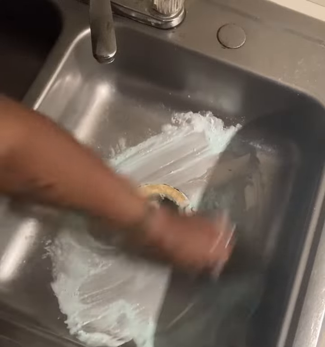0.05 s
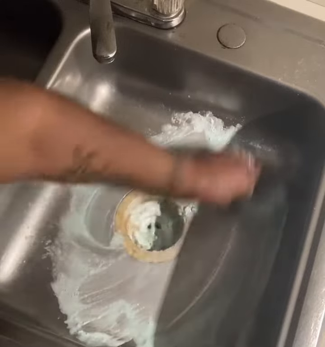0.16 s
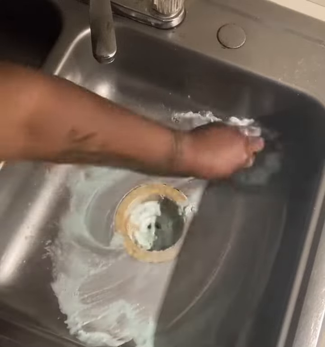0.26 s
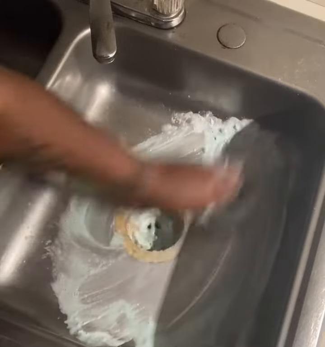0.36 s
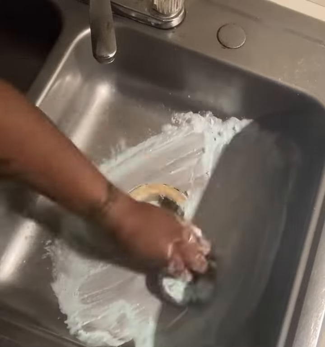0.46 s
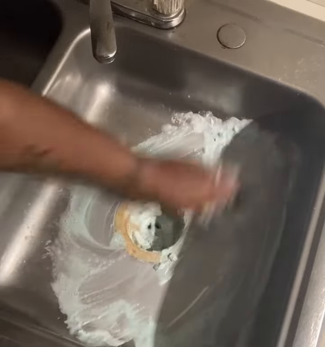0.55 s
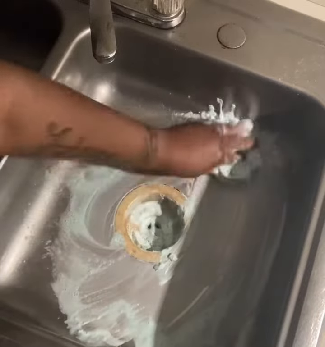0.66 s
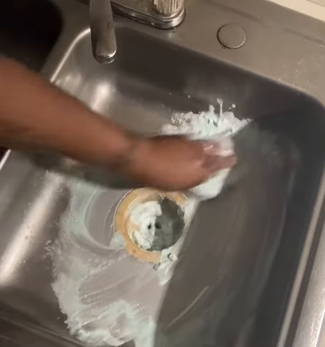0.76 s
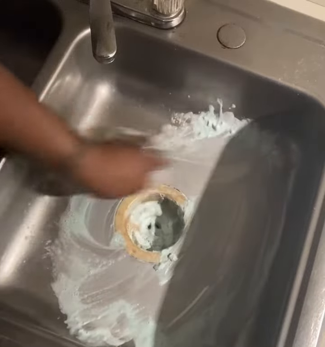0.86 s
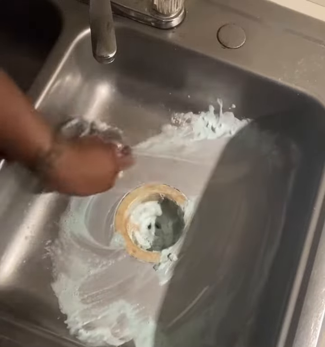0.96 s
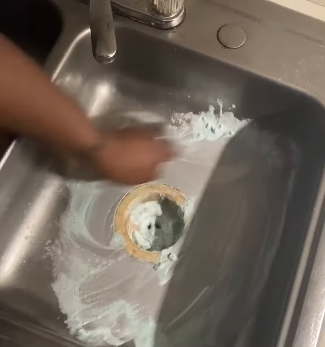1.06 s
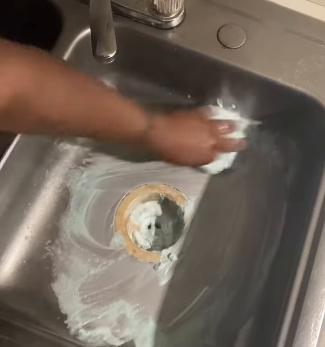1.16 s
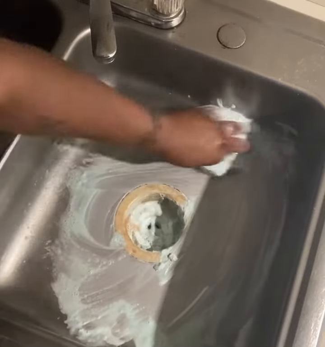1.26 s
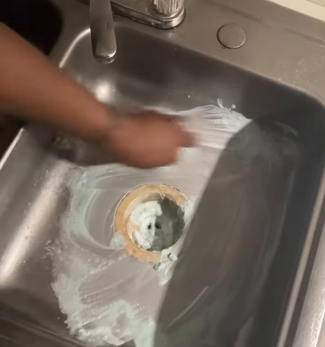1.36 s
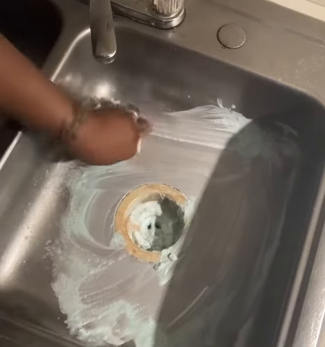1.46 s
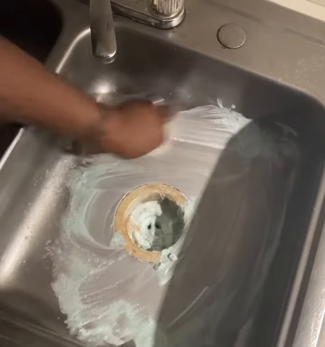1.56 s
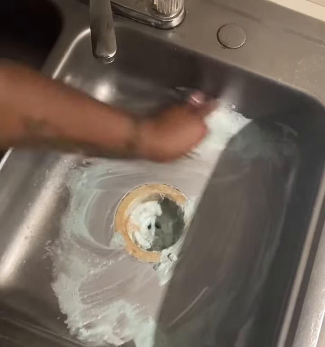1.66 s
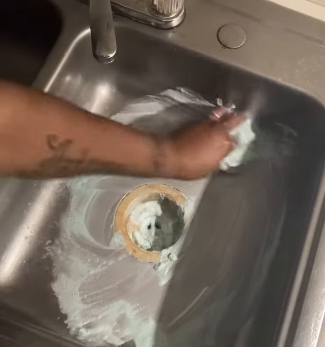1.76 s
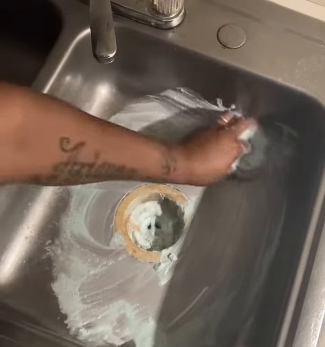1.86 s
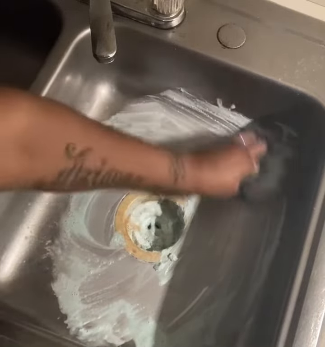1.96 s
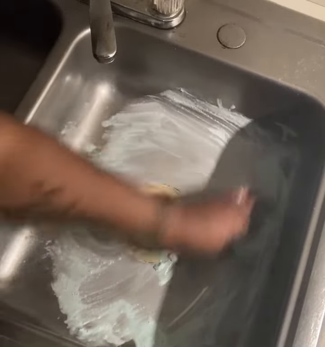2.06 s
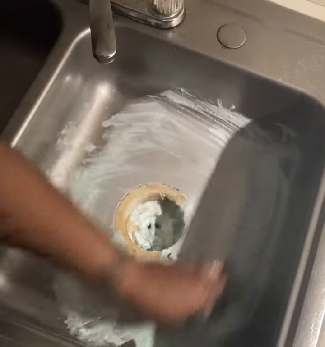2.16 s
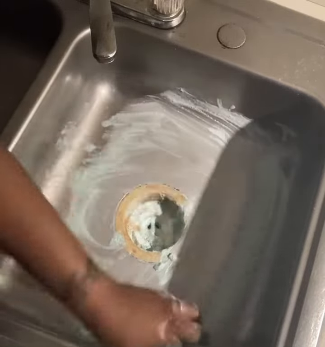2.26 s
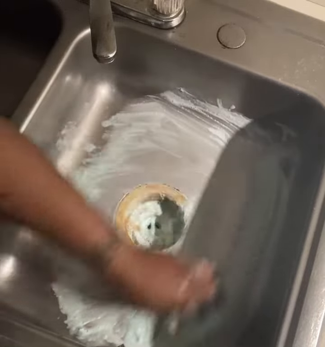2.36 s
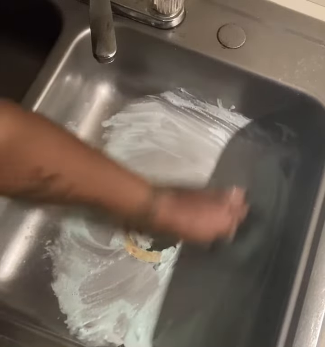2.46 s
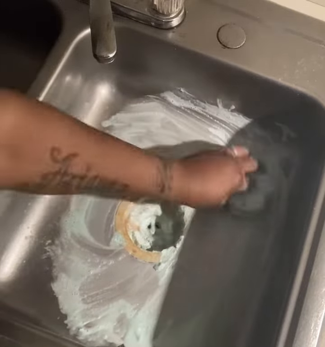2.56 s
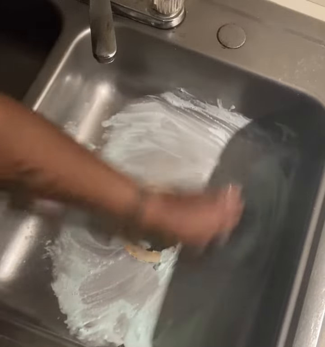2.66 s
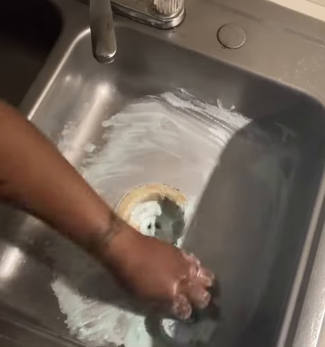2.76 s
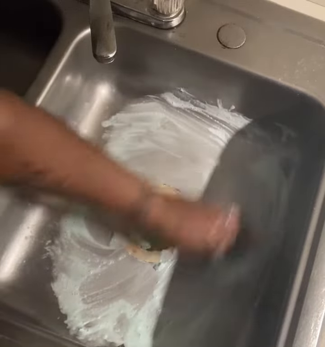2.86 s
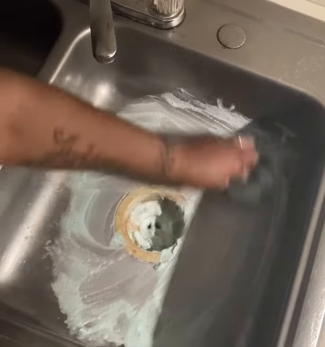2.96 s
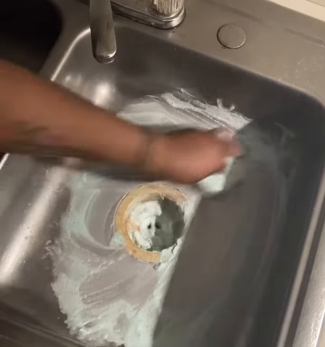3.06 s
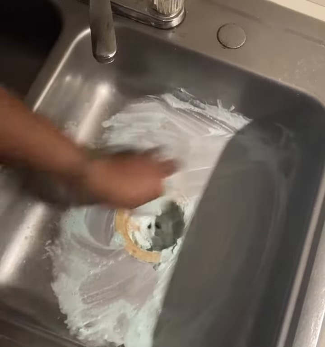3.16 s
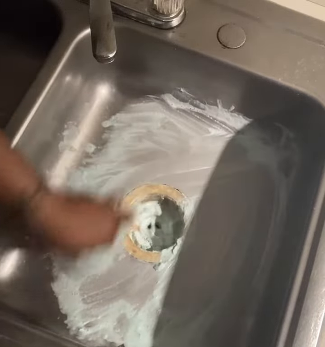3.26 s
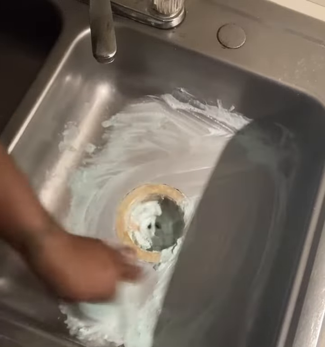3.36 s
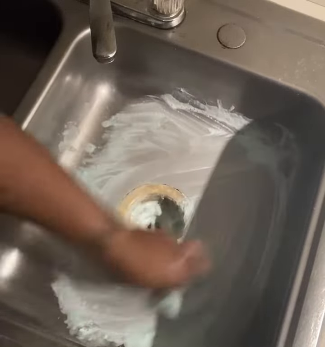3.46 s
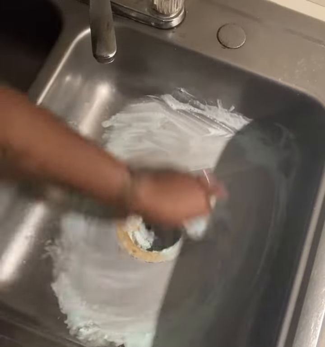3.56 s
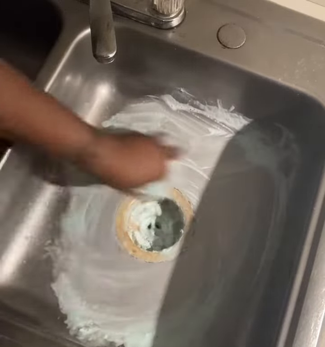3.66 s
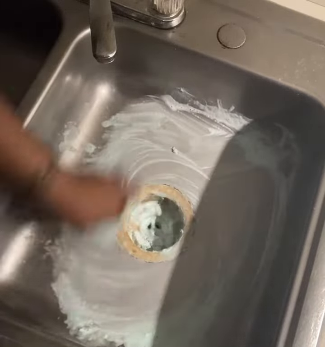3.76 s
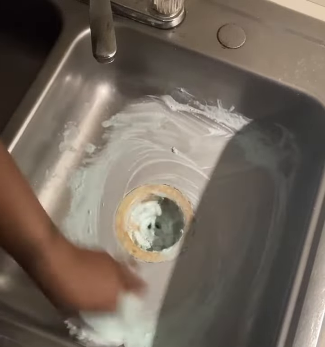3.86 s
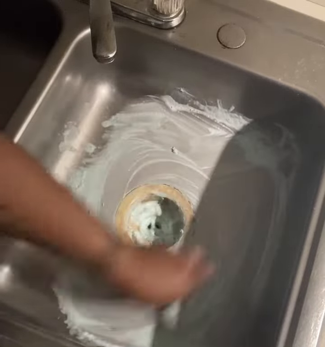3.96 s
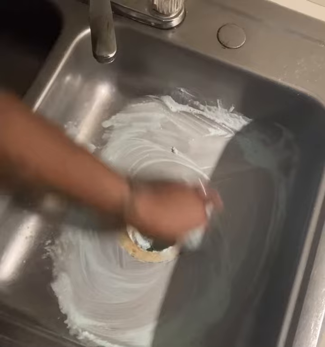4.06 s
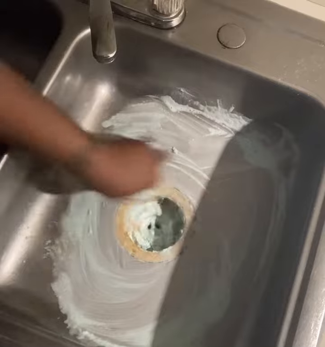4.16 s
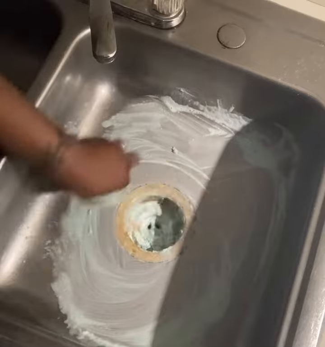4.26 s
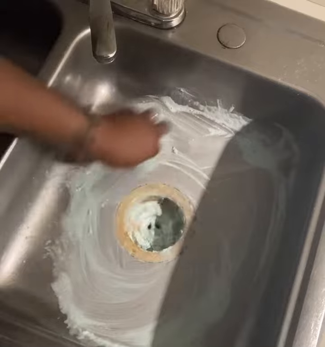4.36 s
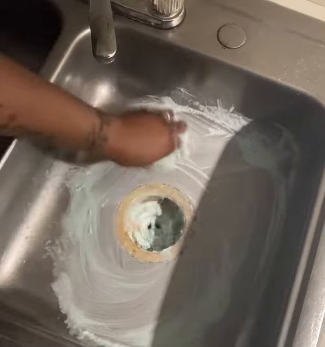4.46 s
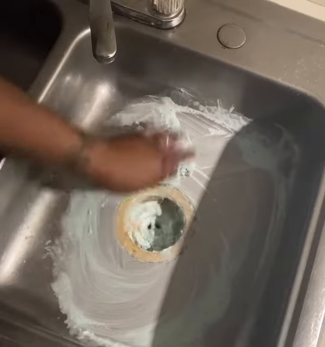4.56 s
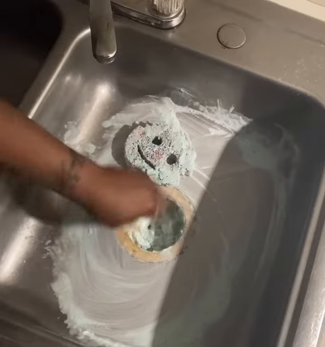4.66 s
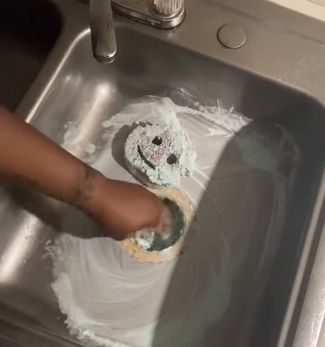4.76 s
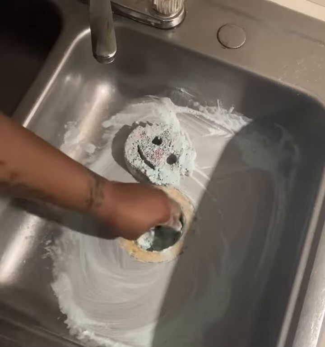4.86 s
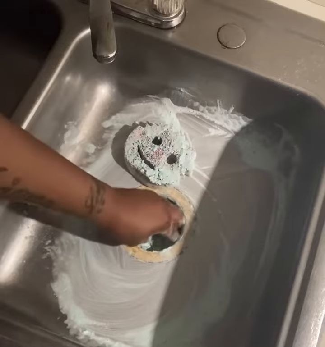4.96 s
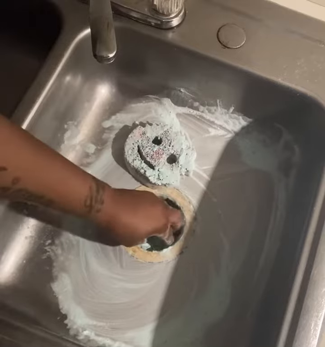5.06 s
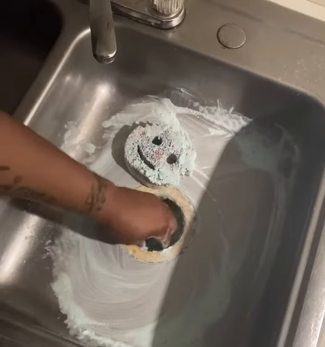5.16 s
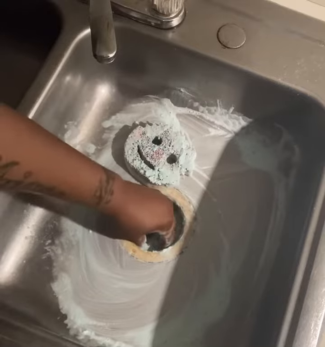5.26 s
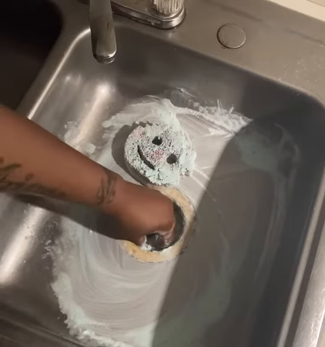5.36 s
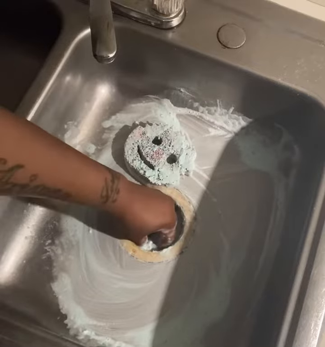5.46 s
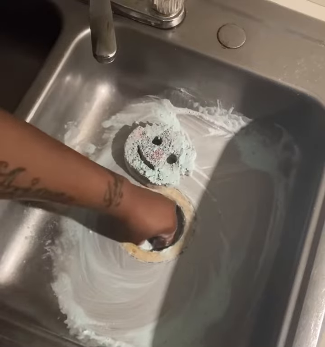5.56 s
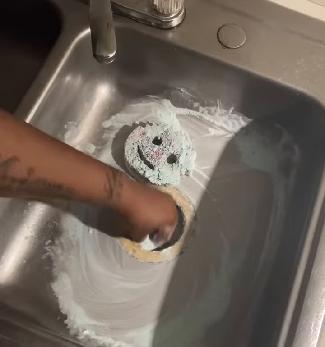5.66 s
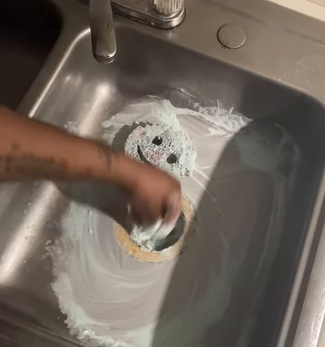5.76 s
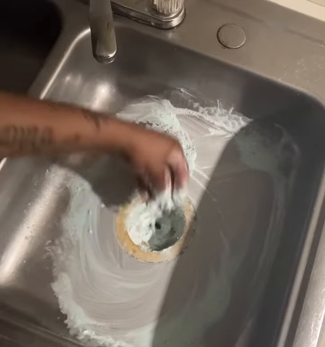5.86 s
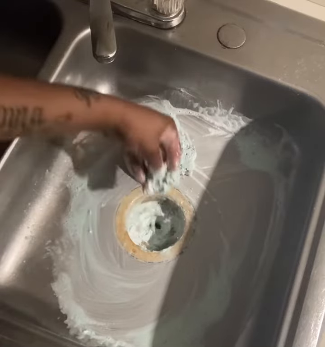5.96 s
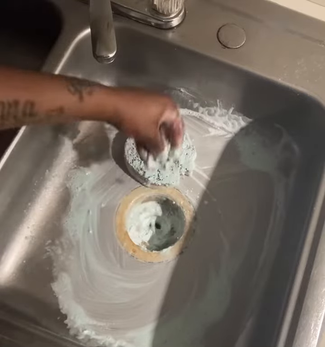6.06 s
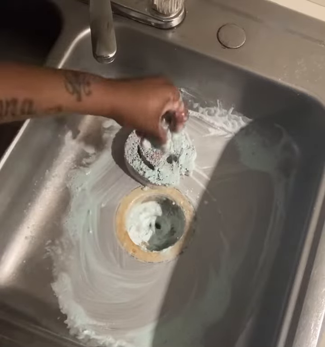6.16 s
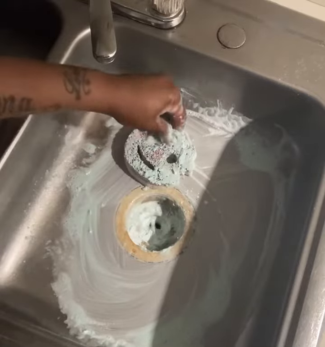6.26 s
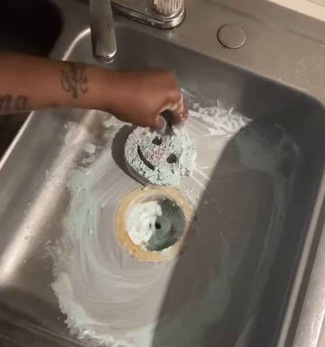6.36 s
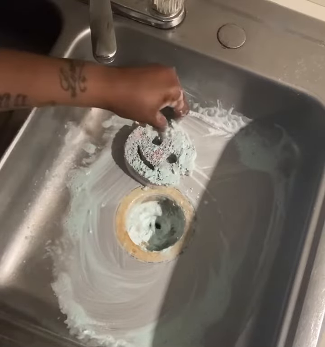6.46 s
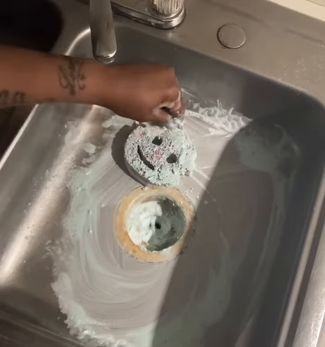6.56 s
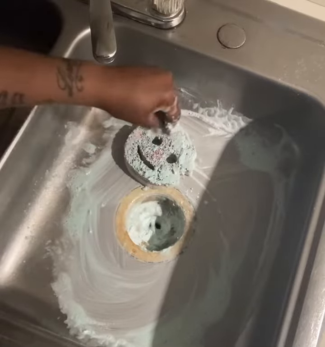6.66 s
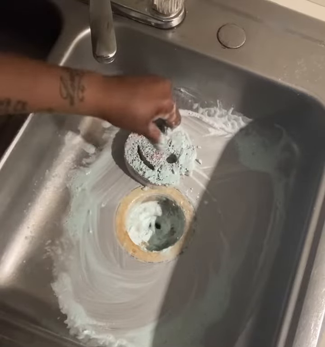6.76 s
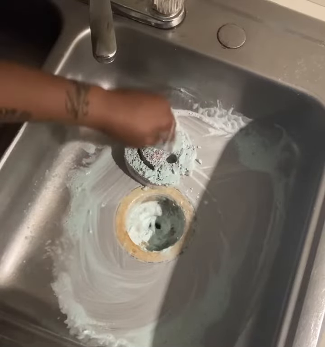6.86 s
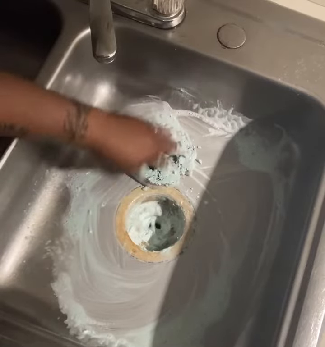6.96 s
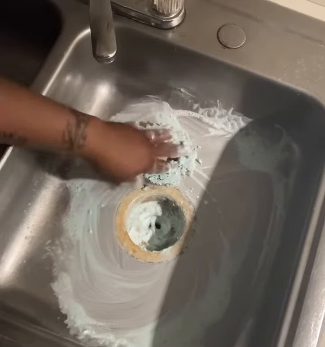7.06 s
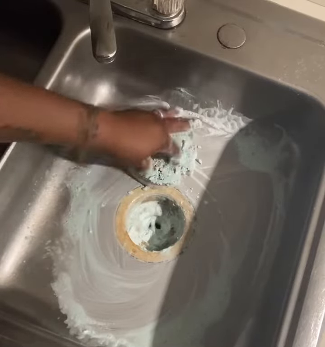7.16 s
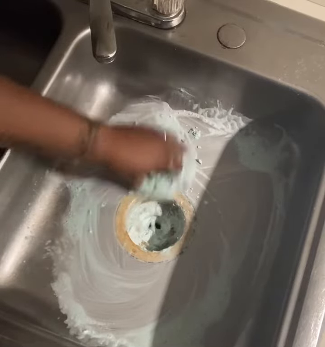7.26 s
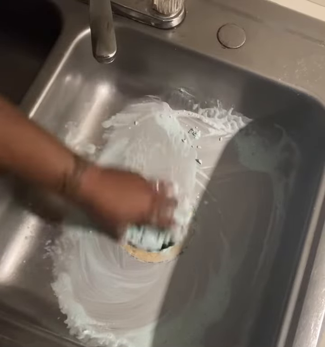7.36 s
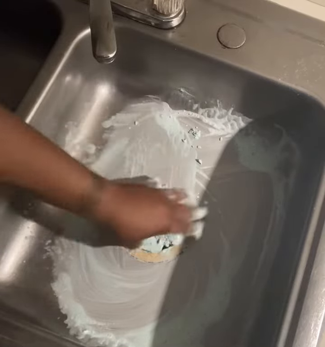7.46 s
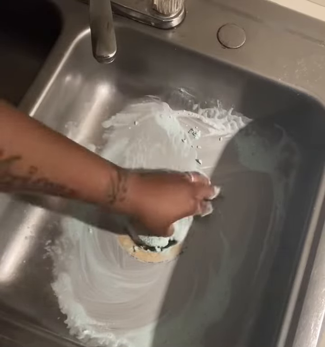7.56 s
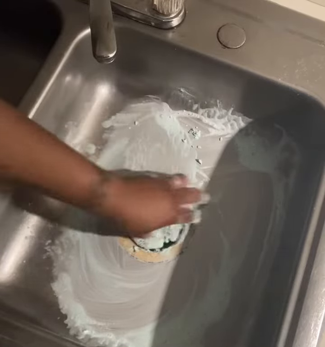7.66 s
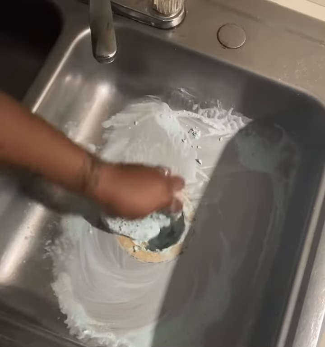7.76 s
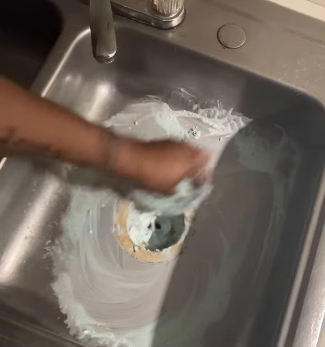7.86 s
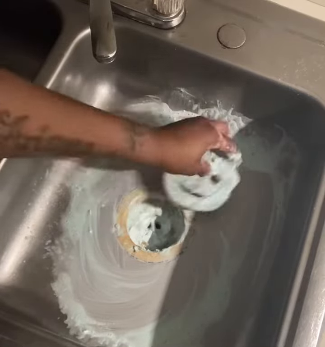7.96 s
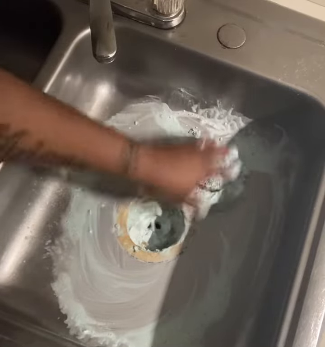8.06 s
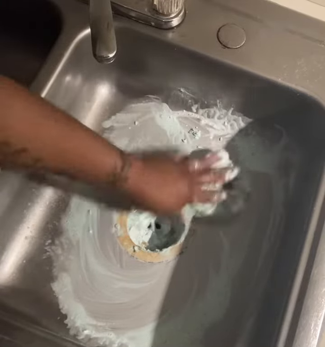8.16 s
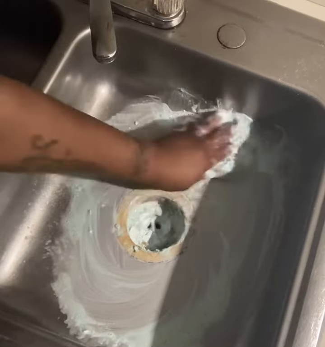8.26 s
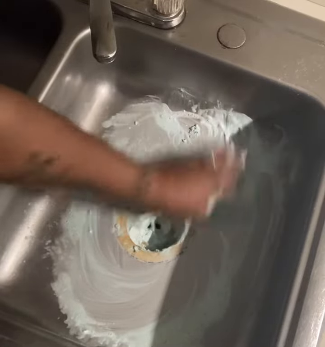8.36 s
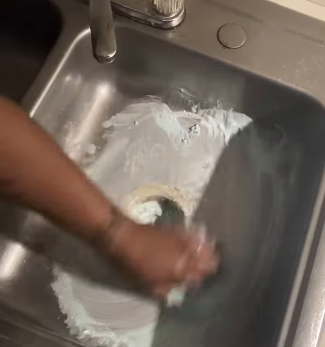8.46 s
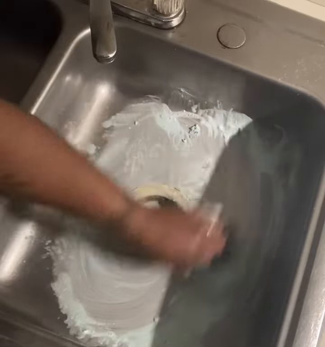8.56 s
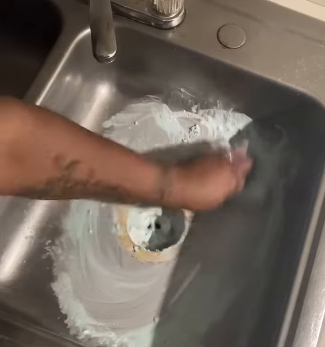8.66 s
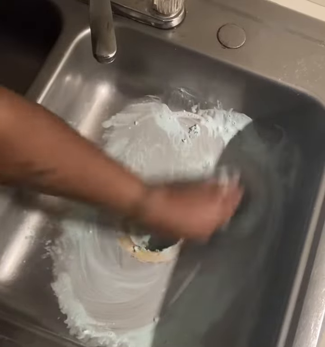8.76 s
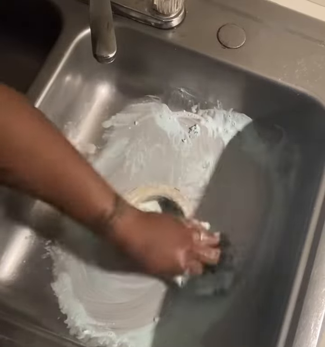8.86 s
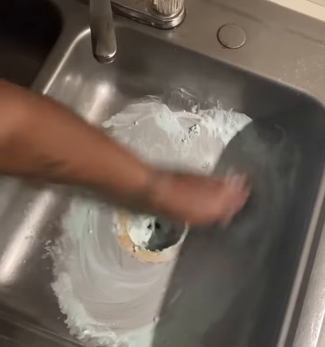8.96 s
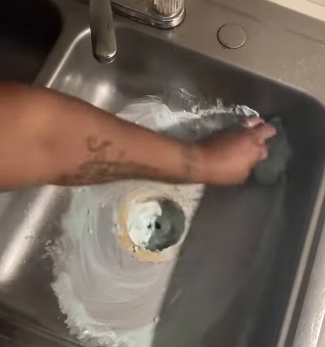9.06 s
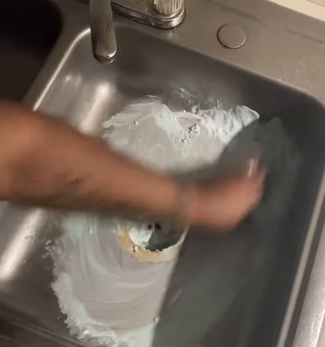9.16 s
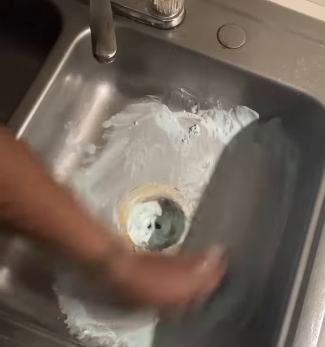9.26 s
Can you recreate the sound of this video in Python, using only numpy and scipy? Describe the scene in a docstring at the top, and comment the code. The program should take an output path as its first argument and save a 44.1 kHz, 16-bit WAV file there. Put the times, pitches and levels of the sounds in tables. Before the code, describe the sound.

Close to a phone in a kitchen, a stiff sponge scours gritty paste across a steel sink in fast, bright, rasping strokes, the sheet ringing dully under drag. Around the middle the scrubbing stops: fingers pick softly at wet paste, with small ticks, hollow knocks and a faint gliding squeak. Then scrubbing returns with a sharp clack and thuds, over a low motor hum.

```python
"""Gritty hiss comes first: a stiff sponge scrubs paste over a steel kitchen sink in long strokes, close to a phone.
Friction noise follows the speed of the hand; drag on the sheet excites dense ringing and the bowl's modes.
Knuckles and sponge knock the sheet as modal impacts, and grit, nail and bursting paste tick as noise pulses.
Between two spells of scrubbing, fingers pick at the wet paste in the drain and a faint whistle glides.
Below lie the harmonics of an appliance motor and a low room rumble, partly held in resonances."""
import sys
import numpy as np
from scipy import signal
from scipy.fft import rfft, irfft, next_fast_len
from scipy.io import wavfile
from scipy.ndimage import uniform_filter1d

SR = 44100
rng = np.random.default_rng(int(sys.argv[2]) if len(sys.argv) > 2 else 0)


def store_wav(level_fs):
    """Save 16-bit WAV to argv[1]."""
    pcm = np.round(np.clip(np.atleast_2d(level_fs), -1, 1) * 32767)
    wavfile.write(sys.argv[1], SR, pcm.T.astype(np.int16))


def magnitude_from_level(level_db):
    """Linear magnitude for a level in decibels (20 dB per decade)."""
    exponent = np.asarray(level_db, float) / 20
    return 10 ** exponent


N = 411012
TIME = np.arange(N) / SR
SIDE_SIGN = np.array([[1], [-1]])  # side signal: added on the left, subtracted on the right

# Spectrum of grit hissing on steel: f/Hz, relative level/dB per Hz
HISS_SPECTRUM = [(1470, -21.5), (2500, -19), (3180, -15), (4040, -9), (7680, -6), (8490, -2), (9690, -2),
                 (14300, -1.5), (15200, -3), (15900, -22)]
# Spectrum of the hiss that differs between left and right: f/Hz, relative level/dB per Hz
HISS_SIDE_SPECTRUM = [(1470, -43), (2500, -8), (4960, -6), (6050, -8), (6480, -19), (7000, -62),
                      (9100, -101)]
# Spectrum of the sheet ringing densely under drag: f/Hz, relative level/dB per Hz
DRAG_SPECTRUM = [(410, -7.5), (700, -3), (884, -5.5), (965, -7.5), (1460, -7.5), (1860, 0), (2350, -5),
                 (3190, -9.5), (4000, -3.5), (5200, -9), (8800, -120)]


def scrub():
    """Friction noise: grains radiate hiss directly, while drag excites the sheet and the bowl's modes."""
    fine_db, coarse_db, drag_db, shake_db = hand()
    # the sponge catches and frees itself as it crosses ridges of paste
    judder_db = 1.06 * walk(40) + 0.74 * walk(150)

    bubbles = rng.standard_normal(N) * (rng.random(N) < 250 / SR)  # bursts in the paste, 250 per second
    hiss = level(colour(grit(1.25), HISS_SPECTRUM), 0.061) + level(colour(bubbles, HISS_SPECTRUM), -14)
    # soft, foamy handling is quieter than -56 dB and sounds more uneven
    foam = uniform_filter1d(1. * (fine_db < -56), SR // 10)
    hiss = patchy(hiss, 1400, 17500, 28, 1.4 + 1.5 * foam, count=7)

    # coarse grains sound lower than fine ones
    coarse = patchy(hiss, 1434, 6000, 24, 1.0 + 0.7 * foam)
    coarse = coarse + SIDE_SIGN * level(colour(grit(2.0), HISS_SIDE_SPECTRUM), -18.0)
    fine = patchy(hiss, 1400 * 2 ** (7 / 3), 20000, 10, 0.7)
    rubbing = magnitude_from_level(fine_db + judder_db) * (fine + magnitude_from_level(coarse_db) * coarse)

    drag_mid, drag_side = (
        patchy(colour(grit(3.3), DRAG_SPECTRUM), 395, 8000, 12, 2.6 + 1.5 * foam, count=5) for _ in range(2))
    drag = level(drag_mid, -4.0) + SIDE_SIGN * level(drag_side, -7.5)
    drag = drag + level(pings(count=3000, lo_hz=844.6, hi_hz=3211), -8.5)
    drag = magnitude_from_level(drag_db + judder_db) * drag

    push = grit(2.9) * magnitude_from_level(shake_db + 0.82 * walk(28))
    body = ring(0.62, 1. * (BOWL_MODES_HZ > 300), 26)  # only modes above 300 Hz answer the rubbing
    shake = signal.fftconvolve(push[None], level(body, -43.5), axes=1)[:, :N]
    return rubbing + drag + shake


# Sponge strokes from turn to turn: start t/s, length t/s, grit level/dB at full speed,
# share of the way where it is fastest, drag level/dB on the sheet at full speed
SPONGE_STROKES = [(-.12, 0.35, -44, 0.53, -54.5), (.2, 0.083, -58, 0.7, -61), (.255, 0.2, -45, 0.43, -56),
                  (.435, .2, -46, 0.43, -59), (.63, 0.31, -46, 0.51, -59), (.93, 0.25, -48.5, 0.56, -63),
                  (1.215, 0.26, -49, 0.47, -61), (1.45, 0.33, -48, 0.53, -57.5),
                  (1.76, 0.33, -53.5, 0.53, -59.5), (1.88, 0.38, -44.5, 0.67, -61),
                  (2.255, 0.32, -43.5, 0.44, -59.5), (2.545, 0.21, -41, 0.59, -59.5),
                  (2.735, 0.27, -42.5, 0.51, -57), (2.95, 0.36, -43, 0.5, -58.5),
                  (3.14, 0.29, -44.5, 0.64, -61), (3.36, 0.35, -41, 0.31, -60), (3.52, 0.6, -44, 0.4, -61),
                  (3.75, 0.37, -41, 0.58, -61.5), (4.05, 0.18, -41.5, 0.52, -57),
                  (4.225, .21, -46, 0.45, -65), (4.42, .14, -50.5, 0.2, -61.5),
                  (7.175, 0.2, -46.5, 0.64, -56), (7.37, 0.18, -48, 0.67, -54),
                  (7.545, 0.091, -64, 0.33, -64), (7.6, 0.27, -48.5, 0.26, -56.5),
                  (7.885, 0.078, -50, 0.65, -57), (7.97, 0.2, -50.5, 0.26, -58.5),
                  (8.11, 0.14, -46, 0.72, -58), (8.255, 0.24, -43, 0.58, -57.5),
                  (8.47, 0.21, -42, 0.52, -58), (8.675, 0.19, -41, 0.44, -59.5),
                  (8.85, 0.2, -42, 0.38, -65), (9.035, 0.83, -42, 0.45, -55.5)]
# Fingers picking and crumbling paste: start t/s, length t/s, grit level/dB at full speed before crumbling,
# share of the way where it is fastest, drag level/dB at full speed before crumbling
FINGER_MOVES = [(4.605, 0.059, -71, 0.18, -67), (4.75, 0.17, -72.5, 0.3, -79),
                (4.87, 0.13, -61.5, 0.54, -69.5), (5, 0.2, -62.5, 0.42, -73.5),
                (5.23, 0.16, -64, 0.55, -65.5), (5.436, 0.2, -64, 0.077, -62),
                (5.53, 0.23, -65.5, 0.4, -71.5), (5.72, 0.2, -89, 0.44, -80),
                (5.82, 0.21, -70, 0.44, -84.5), (5.97, 0.22, -68, 0.52, -83.5),
                (6.12, 0.29, -70, 0.38, -86.5), (6.305, 0.2, -67, 0.31, -85),
                (6.4, 0.15, -65.5, 0.54, -102), (6.5, 0.12, -70, 0.46, -85), (6.62, 0.22, -66.5, 0.26, -87),
                (6.74, 0.079, -71, .6, -100), (6.8, 0.096, -80, .4, -89), (6.905, 0.16, -69, 0.32, -82),
                (7.045, 0.16, -64.5, 0.2, -71.5)]
# Brief surges of drag and bowl shake under sponge or fingers:
# centre t/s, length t/s, drag level/dB, bowl shake level/dB
DRAG_SURGES = [(0.181, 0.03, -45, -78), (0.271, 0.046, -49, -79), (0.595, 0.076, -53.5, -61.5),
               (0.679, 0.092, -52, -65), (0.883, 0.055, -52, -66), (0.963, 0.077, -56, -66),
               (1.123, 0.17, -60, -66.5), (1.272, 0.11, -58, -69), (1.594, 0.077, -53.5, -68),
               (2.02, 0.16, -61.5, -66.5), (2.202, 0.1, -51, -59), (2.291, 0.081, -51.5, -61.5),
               (2.746, 0.1, -60, -66), (3.151, 0.097, -56, -58.5), (4.045, 0.13, -58, -76),
               (4.37, 0.4, -60, -62.5), (5.538, 0.19, -82, -69), (5.636, 0.12, -64, -82),
               (6.661, 0.033, -63, -80), (7.303, 0.2, -57, -62.5), (7.496, 0.064, -54, -68),
               (7.691, 0.16, -52, -56.5), (7.772, 0.1, -51.5, -64), (8.006, 0.023, -32.5, -53),
               (8.057, 0.17, -59, -53.5), (8.232, 0.21, -57.5, -60.5), (8.497, 0.077, -49.5, -58.5),
               (8.697, 0.069, -52, -63.5), (8.872, 0.18, -49.5, -59), (9.023, 0.18, -49, -60),
               (9.246, 0.027, -58, -67), (9.31, 0.052, -47, -64)]


def hand():
    """Power addition of moves, creep and surges: levels in dB of fine grit, coarse above fine, drag and shake."""
    crumble_db = 1.2 * walk(45)  # paste under the fingers gives way unevenly
    power = moves(SPONGE_STROKES, 0.78) + moves(FINGER_MOVES, 1.84) * magnitude_from_level(2 * crumble_db)
    # at a turn the hand creeps on: a 0.17 s average of the power, 13 dB down
    fine, drag = power + magnitude_from_level(2 * -13) * uniform_filter1d(power, int(0.17 * SR))
    shake = magnitude_from_level(2 * -10.5) * drag  # steady shake of the bowl under the drag
    for s, length, surge_drag_db, surge_shake_db in DRAG_SURGES:
        surge = np.exp(-(4 * (TIME - s) / length) ** 2)
        drag = drag + magnitude_from_level(2 * surge_drag_db) * surge
        shake = shake + magnitude_from_level(2 * surge_shake_db) * surge
    fine = fine + magnitude_from_level(2 * -80.5)  # wet paste ticks on at rest
    fine_db, drag_db, shake_db = 10 * np.log10([fine, drag + 1e-11, shake + 1e-11])
    coarse_db = 4 + 0.32 * (drag_db - fine_db)  # coarse grit gains on fine as drag rises
    return fine_db, coarse_db, drag_db, shake_db


def moves(rows, sharp):
    """Half-sine velocity: grit grows as speed to the power sharp, drag less steeply; returns both powers."""
    fine, drag = np.zeros(N), np.zeros(N)
    drag_sharp = sharp * 0.25 / 0.78
    for s, length, grit_db, fastest, drag_db in rows:
        # warp the time so that the half sine peaks at the fastest point
        way = np.clip((TIME - s) / length, 0, 1) ** (np.log(0.5) / np.log(fastest))
        speed = np.abs(np.sin(np.pi * way)) * (way < 1)
        fine += (magnitude_from_level(grit_db) * speed ** sharp) ** 2
        drag += (magnitude_from_level(drag_db) * speed ** drag_sharp) ** 2
    return np.array([fine, drag])


def grit(spread_db):
    """Granular noise: countless slipping grains, most tiny and a few large."""
    size_db = spread_db * np.minimum(rng.exponential(size=N), 5)
    return rng.standard_normal(N) * magnitude_from_level(size_db)


def patchy(x, lo_hz, hi_hz, rate, depth_db, count=3):
    """Sub-band modulation: bands (count per octave) swell and fade at random, each alone; the noise is uneven."""
    size = next_fast_len(N)
    spectrum = rfft(x, size)
    octave = np.log2(np.arange(1, size // 2 + 2) * SR / size)
    out = 0
    for centre in np.arange(np.log2(lo_hz), np.log2(hi_hz), 1 / count):
        share = np.clip(1 - count * abs(octave - centre), 0, 1)
        out = out + magnitude_from_level(depth_db * walk(rate)) * irfft(spectrum * share, size)[:N]
    return out


def pings(count, lo_hz, hi_hz):
    """Local modal excitation: caught grains each ring one high mode of the sheet, left, right or between."""
    out = np.zeros((2, N + SR))
    t = np.arange(SR // 30) / SR
    fade = t * np.exp(-t / 0.005)
    for when, pitch, size, pan in rng.random((count, 4)):
        tone = fade * np.sin(2 * np.pi * lo_hz * (hi_hz / lo_hz) ** pitch * t)
        start = int(when * N)
        out[:, start:start + len(t)] += size * tone * [[pan], [1 - pan]]
    return out[:, :N]


# Modes of the steel bowl: f/Hz, relative level/dB, undamped 60 dB decay t/s, side share (positive is left)
BOWL_MODES = [(65.2, 7.5, 1, 0.075), (96.1, 7, 0.67, -0.072), (117.4, 8, 0.35, 0.083),
              (185, -4.5, 0.18, 0.12), (233, -4, 0.14, -0.1), (299.1, -10, 0.14, -0.054),
              (353.7, -5.5, 0.13, 0.18), (392, -8.5, 0.084, 0.33), (503.7, -12, 0.18, 0.51),
              (540, -12.5, 0.17, -0.54), (642.6, -11.5, 0.16, 0.9), (800.4, -4.5, 0.29, -0.01),
              (957, -15, 0.37, -0.23), (1040, -5.5, 0.049, -1), (1179.4, -16, 0.23, -0.23),
              (1260, -19, 0.085, -2.2), (1256, -27, 0.14, -2.8), (1380, -11.5, 0.1, -0.46),
              (1514, -14.5, 0.1, -0.67), (2020, -20, 0.14, 0.44), (1984, -20.5, 0.073, -1.4),
              (2420, -48, 0.069, .6), (2970, -36, 0.11, .5)]
BOWL_MODES_HZ = np.transpose(BOWL_MODES)[0]


def ring(seconds, gains, damping_db):
    """Modal impulse response, left and right: slow bending waves make low modes swell late; damping per 0.1 s."""
    hz, db, t60, share = np.transpose(BOWL_MODES)[:, :, None]
    t = np.arange(int(seconds * SR)) / SR
    swell = 1 - np.exp(-1.2 * hz * t)
    decay = magnitude_from_level(-60 * t / t60 - 10 * damping_db * t)
    modes = gains[:, None] * magnitude_from_level(db) * np.sin(2 * np.pi * hz * t) * swell * decay
    return modes.sum(0) + SIDE_SIGN * (share * modes).sum(0)


# Knocks on the sheet: t/s, relative blow level/dB, favoured f/Hz, fall/dB per octave away from it,
# damping by the hand/dB per 0.1 s (negative counts as none)
SHEET_KNOCKS = [(0.18, -37.5, 1080, -38, 30), (1.556, -42.5, 623, -8.5, 19), (1.587, -56, 497, 0.5, 8),
                (2.189, -57, 696, -14, 16), (2.299, -55, 815, -2, 12), (3.149, -55, 800, -10, 6),
                (4.047, -44.5, 930, -29, -5), (4.228, -51, 340, -7, 14), (5.315, -49, 533, -33, -3),
                (5.445, -44, 493, -28, -2), (5.466, -45, 560, -30, -1), (5.498, -43, 476, -24, 6),
                (5.53, -58, 510, -5, 12), (5.622, -47, 1820, -19, 3), (6.651, -35.5, 518, -28.5, 10),
                (6.692, -45, 507, -28, -3), (7.409, -31, 220, -11.5, 4), (7.464, -35.5, 400, -9, 28),
                (7.483, -35.5, 435, -11, 7), (7.539, -45, 250, -10, 7), (7.978, -40.5, 425, -16, 6),
                (8.004, -24, 483, -5, 8), (8.209, -46, 1750, -4, 31), (8.487, -65, 1540, -12, 4),
                (9.002, -37.5, 1800, -8.5, 3), (9.013, -34.5, 230, -16, 16), (9.294, -46, 1380, -2.5, -1)]


def knocks():
    """Modal impact: the place of a blow favours modes near one pitch; weak modes blur into a noisy tail."""
    out = np.zeros((2, N + SR))
    t = np.arange(SR // 2) / SR
    slap_s = 0.0017
    boomy = BOWL_MODES_HZ < 150
    place = rng.standard_normal((len(SHEET_KNOCKS), len(BOWL_MODES)))
    noise = rng.standard_normal((len(SHEET_KNOCKS), 2, len(t)))
    for (s, db, hz, slope_db, damping_db), chance, blur in zip(SHEET_KNOCKS, place, noise):
        damping_db = max(damping_db, 0)
        near_db = db + 3.0 + np.minimum(slope_db, 0) * abs(np.log2(BOWL_MODES_HZ / hz))
        # the lowest modes boom on every blow, nearly wherever it lands
        boom_db = db - 8.5 + 0.26 * (near_db - db)
        sign = np.where(boomy, -1, np.sign(chance))
        gains = sign * magnitude_from_level(1.24 * chance + np.where(boomy, boom_db, near_db))

        band = signal.butter(2, [hz / 2, hz * 1.88], "band", fs=SR, output="sos")
        tail_db = db + 8 + 0.75 * slope_db - (257 + 10 * damping_db) * t
        tail = signal.sosfilt(band, (blur[0] + 0.86 * SIDE_SIGN * blur[1]) * magnitude_from_level(tail_db))

        # the blunt push that starts a broad blow
        slap = magnitude_from_level(db + 6 + 1.3 * slope_db) * t / slap_s * np.exp(1 - t / slap_s)
        slap = slap * np.sin(2 * np.pi * 0.885 * hz * t)
        start = int(s * SR)
        out[:, start:start + len(t)] += ring(0.5, gains, damping_db) + tail + slap
    return out[:, :N]


# Ticks of grit, nail and bursting paste: t/s, level/dB before band filtering, centre f/Hz, 60 dB decay t/s
PASTE_TICKS = [(4.614, -54, 6720, 0.044), (4.725, -68, 1500, .03), (4.892, -56, 4390, 0.054),
               (5.028, -63, 9550, .025), (5.076, -47, 6000, 0.03), (5.3144, -53, 8320, 0.025),
               (5.4436, -63, 4340, 0.025), (5.628, -51, 2740, 0.025), (6.314, -60, 4200, 0.042),
               (6.452, -49.5, 11900, 0.03), (6.649, -57, 9450, 0.025), (6.741, -58, 11000, .025),
               (6.783, -72, 8020, 0.022), (6.908, -62, 10500, 0.025), (6.928, -59, 11200, 0.025),
               (7.061, -52, 7600, 0.025), (7.085, -51, 8010, 0.032), (7.1776, -41, 7900, 0.055),
               (7.911, -41.5, 2020, 0.04), (7.979, -35.5, 8010, 0.025), (8.003, -19, 8850, 0.022),
               (8.1467, -39, 11800, 0.025), (9.0014, -31, 4520, 0.093), (9.29, -32, 4450, 0.078)]


def ticks():
    """Band-limited noise pulse: a sharp onset with a short exponential fade."""
    out = np.zeros(N + SR)
    t = np.arange(SR // 8) / SR
    noises = rng.standard_normal((len(PASTE_TICKS), len(t)))
    for (s, db, hz, t60), noise in zip(PASTE_TICKS, noises):
        band = signal.butter(1, [hz / 1.52, min(hz * 1.72, 17000)], "band", fs=SR, output="sos")
        fade = np.exp(-np.log(1000) * t / t60)
        start = int(s * SR)
        out[start:start + len(t)] += magnitude_from_level(db) * signal.sosfilt(band, noise * fade)
    return out[:N]


# Path of the gliding whistle: t/s, mean f/Hz, level/dB before flutter and panning
WHISTLE_PATH = [(5.17, 2560, -90), (5.19, 2630, -76), (5.235, 2900, -78), (5.27, 2930, -79),
                (5.3, 2940, -83), (5.335, 2930, -78), (5.41, 2950, -85), (5.47, 2980, -84),
                (5.49, 2960, -77), (5.535, 2880, -75), (5.575, 3030, -76), (5.6, 2950, -90),
                (5.67, 2830, -86), (5.72, 3070, -80), (5.77, 3030, -80), (5.82, 3030, -79),
                (5.855, 2870, -77), (5.895, 2480, -80), (5.915, 2400, -94)]


def squeak():
    """Frequency-modulated tone over rough rubbing, thin and to the left: perhaps a wet finger sliding on steel."""
    s, hz, db = np.transpose(WHISTLE_PATH)
    pitch = np.interp(TIME, s, hz) * (1 + 0.006 * walk(200))
    flutter = magnitude_from_level(2.5 * walk(150))
    whistle = flutter * np.sin(2 * np.pi * np.cumsum(pitch) / SR)
    # the rubbing lies just under the whistle in pitch
    rub = level(colour(grit(3), [(1800, -20), (2100, 0), (2500, 0), (3200, -10)]), -11)
    tone = magnitude_from_level(np.interp(TIME, s, db, -150, -150)) * (whistle + rub)
    return tone * (1 + 0.82 * SIDE_SIGN)


# Motor lines: f as a multiple of the shaft rate, rms level/dB about which each line wavers, before panning
MOTOR_LINES = [(1, -58), (2, -54), (4, -65)]
# Rumble held in room resonances: f/Hz, bandwidth f/Hz, rms level/dB before panning
ROOM_RESONANCES = [(56.23, 7.5, -53.5), (94.63, 4.3, -60)]
# Spectrum of the rumble common to both sides: f/Hz, relative level/dB per Hz
RUMBLE_SPECTRUM = [(25, -44), (36, -14), (45, -4.5), (56, 2.5), (70, -5), (96, -2.5), (125, -8.5),
                   (140, -17), (190, -16.5), (300, -18), (400, -29.5), (550, -44.5), (800, -54),
                   (3000, -52)]
# Spectrum of the rumble that differs between the sides: f/Hz, relative level/dB per Hz
RUMBLE_SIDE_SPECTRUM = [(18, -25), (30, -9), (64, -6.5), (87, -14), (118, 0.5), (140, -22), (236, -13.5),
                        (572, -31.5), (3000, -44), (3900, -49), (6600, -120)]


def kitchen():
    """Harmonics of a rotating shaft over low broadband noise, part of it held in narrow room resonances."""
    shaft_hz = 58.7 + 0.04 * walk(3)
    turn = 2 * np.pi * np.cumsum(shaft_hz) / SR
    hum = sum(np.sqrt(2) * magnitude_from_level(db + 1.2 * walk(5)) * np.sin(order * turn) for order, db in MOTOR_LINES)
    for hz, width_hz, db in ROOM_RESONANCES:
        band = signal.butter(2, [hz - width_hz / 2, hz + width_hz / 2], "band", fs=SR, output="sos")
        hum = hum + level(signal.sosfilt(band, rng.standard_normal(N)), db)
    mid = level(colour(rng.standard_normal(N), RUMBLE_SPECTRUM), -54)
    side = level(colour(rng.standard_normal(N), RUMBLE_SIDE_SPECTRUM), -61)
    return hum * magnitude_from_level(0.28 * SIDE_SIGN) + mid + SIDE_SIGN * side  # the hum leans slightly left


def level(x, db):
    """Root-mean-square normalisation: scales a sound to an rms level in dB."""
    return x * magnitude_from_level(db) / np.sqrt(np.mean(x ** 2))


def colour(x, points):
    """Spectral shaping by (Hz, dB) points, joined on a log frequency axis; all but silent outside them."""
    size = next_fast_len(len(x))
    hz, db = np.transpose(points)
    bins = np.log(np.arange(1, size // 2 + 2) * SR / size)
    gain = magnitude_from_level(np.interp(bins, np.log(hz), db, -150, -150))
    return irfft(rfft(x, size) * gain, size)[:len(x)]


def walk(rate):
    """Low-pass random modulation: levels held 1 / rate s and slewed twice, with a spread of 1."""
    k = int(SR / rate)
    held = np.repeat(rng.standard_normal(N // k + 2), k)
    x = uniform_filter1d(uniform_filter1d(held, k), k)[:N]
    return x / x.std()


def scene():
    """Superposition: all sources as the two microphone ports hear them."""
    return scrub() + knocks() + ticks() + squeak() + kitchen()


def band_limit(x):
    """A steep low-pass at the top of the band."""
    return signal.sosfilt(signal.butter(12, 16720, fs=SR, output="sos"), x)


def record(dry):
    """Phase opposition: near 800 Hz the two ports hear opposite pressure, so their sum dips; the top is cut."""
    mid, side = (dry[0] + dry[1]) / 2, (dry[0] - dry[1]) / 2
    mid = mid - 0.81 * signal.lfilter(*signal.iirpeak(800, 3.5, fs=SR), mid)
    low_pass = signal.ellip(10, 0.3, 80, 15780, fs=SR, output="sos")
    mix = signal.sosfilt(low_pass, mid + SIDE_SIGN * side)
    return band_limit(mix)


dry = scene()
out = record(dry)
store_wav(out)
```